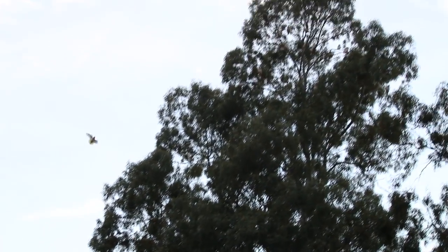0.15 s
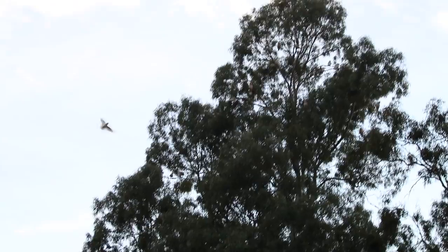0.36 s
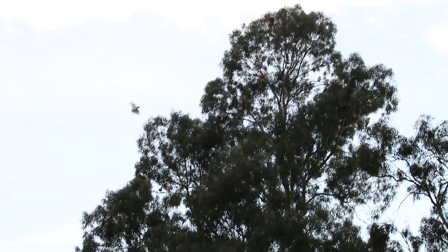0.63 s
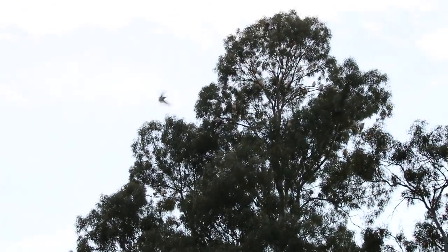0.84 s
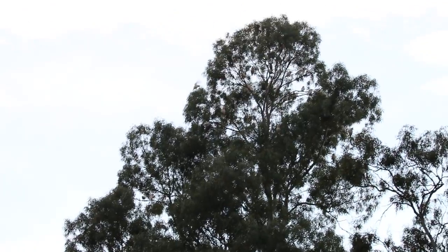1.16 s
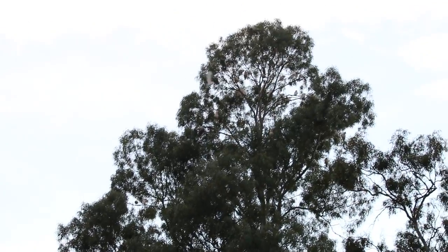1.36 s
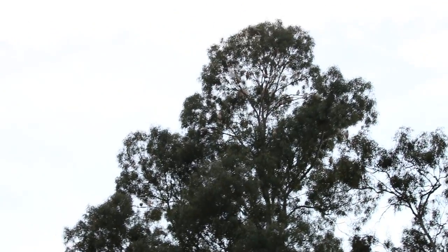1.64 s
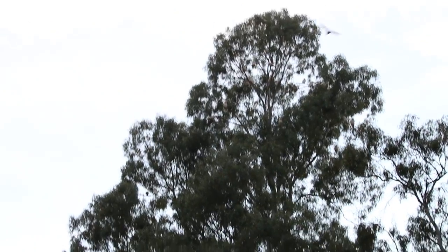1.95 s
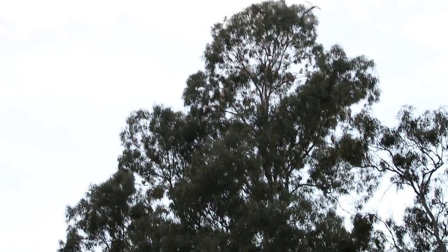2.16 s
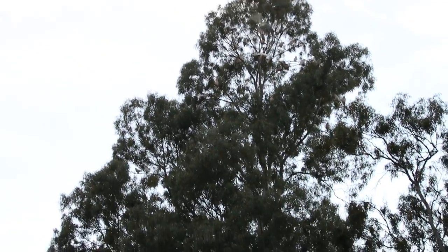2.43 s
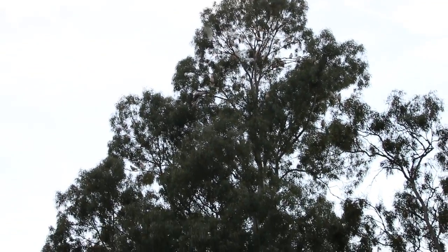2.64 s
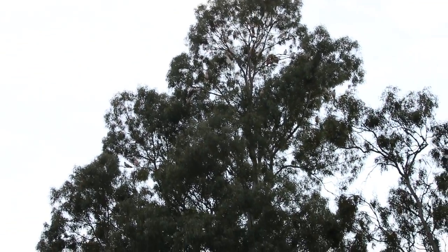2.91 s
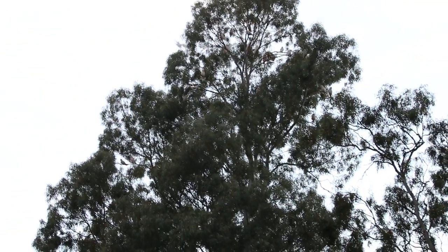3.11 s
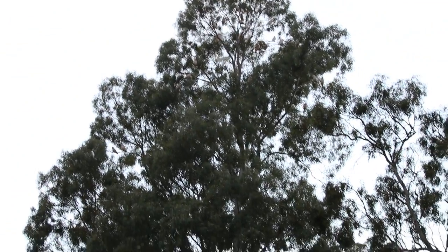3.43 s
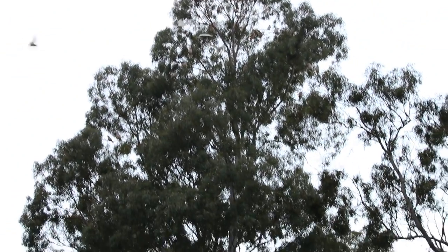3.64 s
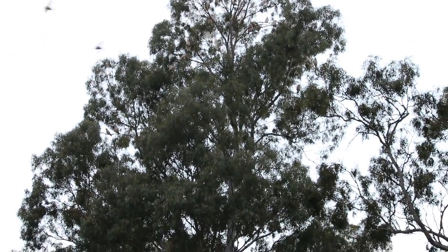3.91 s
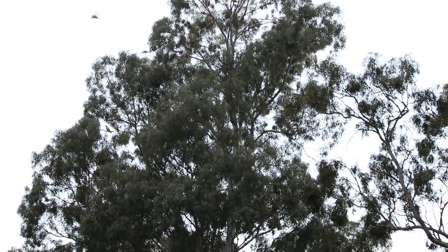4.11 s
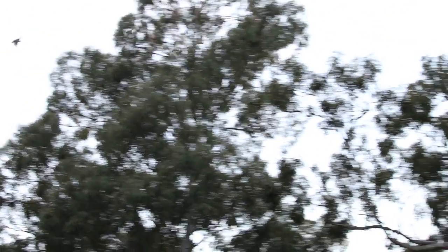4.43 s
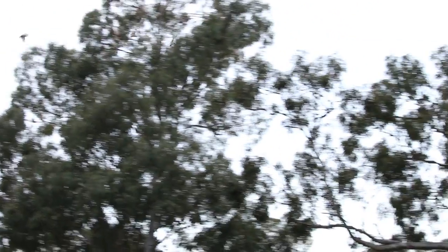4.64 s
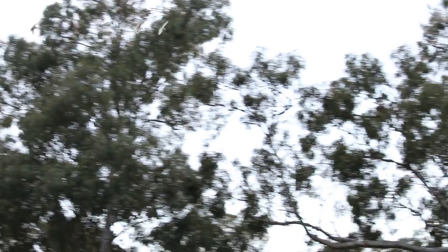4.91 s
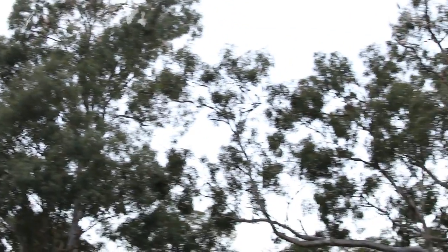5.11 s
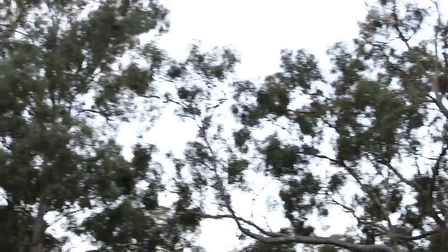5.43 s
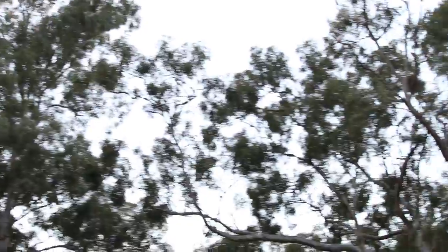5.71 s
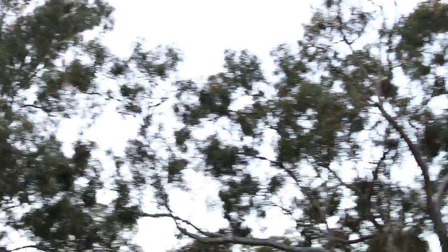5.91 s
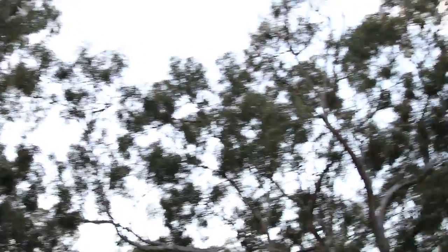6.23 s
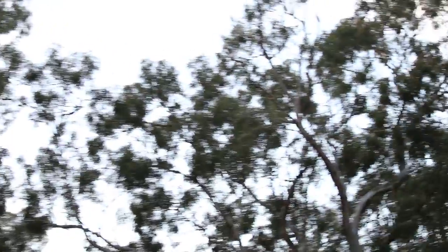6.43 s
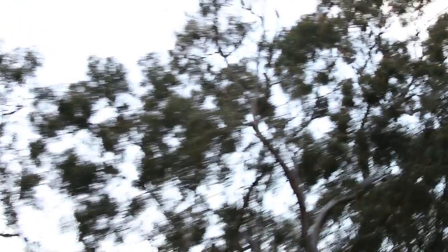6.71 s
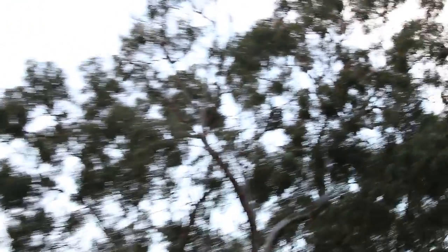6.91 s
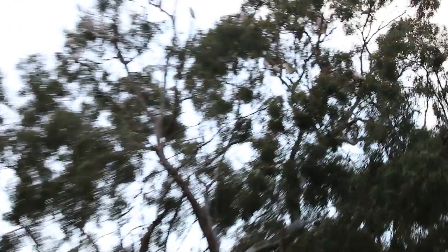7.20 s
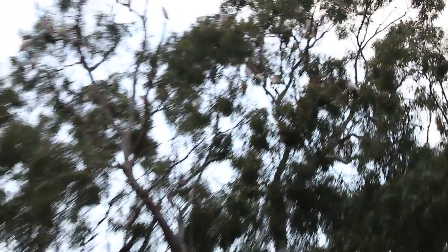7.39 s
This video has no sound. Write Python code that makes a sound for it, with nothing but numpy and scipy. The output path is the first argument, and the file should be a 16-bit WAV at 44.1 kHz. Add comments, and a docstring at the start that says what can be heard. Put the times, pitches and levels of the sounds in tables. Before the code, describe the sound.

A cockatoo flock passes in open air: rapid clusters of brief throaty yelps, then hoarse screeches mixed with more squawks, another strong burst midway, and later quieter, more scattered calls. One longer, bright, piercing cry stands out close to the end before a few faint notes. Far birds blur behind, the woodland adds a thin lingering echo, and soft low rumble with a faint hum continues throughout. Wide stereo outdoor pickup, near calls leaning left.

```python
"""Cockatoos call outdoors: near birds give short arched notes, one long held call and harsh rasps.
Notes and held call are harmonics of a gliding pitch through a vocal tract; rasps are random pulses
ringing throat resonances. Many overlapping far notes blur into a chorus.
Trees return a long thin echo of sparse taps, over shaped noise (a low rumble) and a faint hum."""
import sys
import numpy as np
from scipy import signal
from scipy.fft import rfft, irfft
from scipy.io import wavfile
from scipy.ndimage import uniform_filter1d

SR = 44100
rng = np.random.default_rng(int(sys.argv[2]) if len(sys.argv) > 2 else 0)


def transcribe(signal):
    """Save signal, clipped to [-1, 1], as a 16-bit WAV file at the path in sys.argv[1]."""
    frames = np.atleast_2d(signal).T
    limited = np.clip(frames, -1, 1)
    pcm = np.round(limited * 32767).astype(np.int16)
    wavfile.write(sys.argv[1], SR, pcm)


N = 333396
EDGE_HZ = 15760  # upper band limit


def gain_of(db):
    """Decibels to an amplitude factor."""
    return 10 ** (np.asarray(db) / 20)


def evened(x):
    """Scales to rms 1."""
    return x / np.sqrt(np.mean(x ** 2) + 1e-20)


def read(points, hz):
    """Interpolates (hz, value) points on a log-frequency axis."""
    point_hz, value = np.transpose(points)
    return np.interp(np.log(hz + 1), np.log(point_hz + 1), value)


def add(mix, start_s, sound):
    """Adds a stereo sound at start_s, cut at the end of the mix."""
    part = mix[:, max(round(start_s * SR), 0):][:, :sound.shape[1]]
    part += sound[:, :part.shape[1]]


def wander(count, hz):
    """Random wobble of rms 1, up to about hz: a moving average of white noise."""
    span = max(int(SR / hz), 1)
    return np.sqrt(span) * uniform_filter1d(rng.standard_normal(count), span)


# Background noise spectrum: [freq_hz, relative_db]
RUMBLE_SPECTRUM = [(15, -60), (32, -25.5), (113, -8), (379, -14), (705, -6), (2130, -7), (5030, -17.5),
                   (9000, -39.5), (15600, -45)]
RUMBLE_RMS_DB = -39
# Hum lines: [freq_hz, level_db]
HUM_LINES = [(100, -61), (124, -69.5), (144.5, -60)]


def hum():
    """Sine lines that waver in level and pitch."""
    out = np.zeros(N)
    for line_hz, level_db in HUM_LINES:
        level = np.sqrt(2) * gain_of(level_db + 2 * wander(N, 10))
        hz = line_hz + 2.3 * wander(N, 4.72)
        out += level * np.sin(2 * np.pi * np.cumsum(hz) / SR)
    return out


def rumble():
    """Distant low noise and hiss: shaped noise, alike in both channels in the bass, unlike in the treble."""
    hz = np.fft.rfftfreq(N, 1 / SR)
    a, b = rfft(rng.standard_normal((2, N)))
    likeness = read([(40, 1.0), (150, 0.91), (600, 0.81), (3000, 0.017)], hz)  # [freq_hz, correlation]
    likeness = np.clip(likeness, 0, 1)
    right = likeness * a + np.sqrt(1 - likeness ** 2) * b
    spectrum = np.array([a, right]) * gain_of(read(RUMBLE_SPECTRUM, hz))
    left_over_right_db = read([(30, 10.0), (300, -0.5), (2000, 0.5)], hz)  # [freq_hz, db]
    balance = gain_of(np.outer([.5, -.5], left_over_right_db))
    return gain_of(RUMBLE_RMS_DB) * evened(irfft(spectrum * balance, N))


def trees(x):
    """Sparse echoes from trunks and leaves: random signed taps, the treble dying first."""
    taps = np.zeros((2, SR))
    grid = np.arange(500, SR - 20, 20)  # samples
    at = grid + rng.integers(0, 20, (2, (SR - 501) // 20))
    np.put_along_axis(taps, at, rng.choice([-1., 1.], at.shape), 1)
    hz, t, spectrum = signal.stft(taps, SR, nperseg=256)
    t60_s = read([(600, 1.05), (3000, 0.81), (10000, 0.5)], hz)[:, None]  # [freq_hz, t60_s]
    tail = signal.istft(spectrum * gain_of(-60 * t / t60_s), SR, nperseg=256)[1]
    return signal.fftconvolve(x, tail / np.linalg.norm(tail[0]), axes=1)[:, :N]


def voice(hz, tract, rough, dull_db_per_khz, pan_db, count, vary_db):
    """Harmonics of an unsteady pitch through the vocal tract, dulled on the way, in stereo."""
    k = np.arange(1, count + 1)[:, None]
    hz = hz * (1 + 0.075 * rough * wander(len(hz), 420))
    turns = np.cumsum(hz) / SR + rng.random()
    # leaves on the way break up each harmonic
    rate, start = rng.random((2, count, 1))
    flutter = np.sin(2 * np.pi * (55 * rate * np.arange(len(hz)) / SR + start))
    # no two beaks are open alike
    colour_db = vary_db * (rng.standard_normal((count, 1)) + 1.56 * flutter)
    size = gain_of(read(tract, k * hz) + colour_db - dull_db_per_khz * k * hz / 1000)
    size *= k * hz < EDGE_HZ
    rms = np.sqrt((size ** 2).sum(0).mean() / 2)
    size *= (1 + rough * wander(len(hz), 900)) / rms  # uneven cycles
    side_db = np.array([.5, -.5])[:, None, None] * pan_db
    lead_s = side_db * 2.2e-5  # the louder microphone port is the nearer one
    shade = gain_of(side_db * np.minimum(k * hz / 1800, 1.3))  # the camera body shades treble most
    phase = k * (turns + hz * lead_s) + rng.random((count, 1))  # the tract spreads the phases
    return (size * shade * np.cos(2 * np.pi * phase)).sum(1)


# Vocal tract in short notes: [freq_hz, relative_db]
NOTE_TRACT = [(290, -41), (500, -7.5), (873, -18.5), (1270, -3), (1610, -3), (2200, -1), (3450, -8),
              (3950, -10.5), (5300, -16.5), (7000, -25), (9400, -31), (14000, -47)]
REACH = 1.52  # sounding length / core length


def note(core_s, top_hz, sag, lean, level_db, pan_db, rough, dull_db_per_khz, count, vary_db):
    """One syllable: the pitch arches over its top and keeps sagging as the sound fades."""
    u = np.linspace(-REACH, REACH, int(REACH * core_s * SR))  # core spans -1 to 1
    hz = top_hz * (1 - sag * u ** 2 + lean * u)
    swell = signal.windows.tukey(len(u), .7)
    return gain_of(level_db) * swell * voice(hz, NOTE_TRACT, rough, dull_db_per_khz, pan_db, count, vary_db)


# Level of the far birds together: [time_s, level_db]
CHORUS_LEVEL = [(0.0, -36.5), (0.65, -34.5), (0.78, -27), (1.35, -43.5), (2.08, -29), (3.62, -40),
                (3.81, -27), (4.78, -31), (5.03, -38.5), (5.49, -32.5), (6.91, -41.5), (7.25, -33),
                (7.56, -56)]


def chorus(count=560):
    """Overlapping notes of many far birds, most of them low, spread across the stereo image."""
    out = np.zeros((2, N))
    for when, size, low, bend, tip, loud, side in rng.random((count, 7)):
        core_s = 0.02204 + 0.02984 * size
        top_hz = 650 * (1 + 0.42 * low ** 2.2)
        call = note(core_s, top_hz, .16 * bend, 0.0788 * (tip - .5), 14.6 * loud, 14 * side - 9.5,
                    0.17, 0.093, count=10, vary_db=2.0)
        add(out, when * N / SR - .03, call)
    # the chorus level rises and falls, with swells just after the loudest near notes
    power = uniform_filter1d((out ** 2).mean(0), 5000)
    time_s, level_db = np.transpose(CHORUS_LEVEL)
    level = gain_of(np.interp(np.arange(N) / SR, time_s, level_db))
    return out / np.sqrt(abs(power) + 1e-9) * level


def resonate(x, hz, width_hz):
    """Gliding resonance: shifts the curve hz down to zero, smooths twice, shifts back."""
    turn = np.exp(2j * np.pi * np.cumsum(hz) / SR)
    r = np.exp(-np.pi * width_hz / SR)
    low = signal.lfilter([1 - r], [1, -r], x / turn)
    return 2 * (turn * signal.lfilter([1 - r], [1, -r], low)).real


# Rasping screeches: [start_s, length_s, level_db, throat_first_hz, throat_last_hz, left_over_right_db]
RASP_CALLS = [(1.756, 0.23, -27.5, 2180, 2850, -1.5), (2.072, 0.14, -33, 2400, 2440, -1.5),
              (2.74, 0.16, -33, 2400, 2420, -2), (3.011, 0.095, -29, 2300, 2520, -2.5),
              (4.602, 0.16, -33.5, 2270, 2300, 1.5), (4.8, 0.23, -34, 2350, 2390, -2),
              (5.199, 0.395, -36, 2130, 2290, -2.5), (6.037, 0.1, -36.5, 2400, 2400, -3),
              (6.531, 0.19, -38, 2260, 2330, -3)]


def rasps():
    """Chaotic pulses of the syrinx ring a gliding throat resonance and others beside it."""
    modes = [(.5, 613, -2.5), (1.0, 523, 9), (1.45, 790, 4),
             (2.1, 1650, 2.5), (3.0, 3470, -70)]  # [throat_multiple, width_hz, relative_db]
    out = np.zeros((2, N))
    for start_s, length_s, level_db, first_hz, last_hz, pan_db in RASP_CALLS:
        n = int(length_s * SR)
        pulses = (rng.random(n) < 1500 / SR) * gain_of(1.17 * rng.standard_normal(n))  # 1500 per s
        pulses = pulses - uniform_filter1d(pulses, size=60)  # no steady push is radiated
        throat_hz = np.linspace(first_hz, last_hz, n)
        call = sum(gain_of(mode_db) * evened(resonate(pulses, multiple * throat_hz, width_hz))
                   for multiple, width_hz, mode_db in modes)
        level = gain_of(level_db + 2.0 * wander(n, 30))
        call = level * evened(call) * signal.windows.tukey(n, .35)
        pair = np.array([np.roll(call, -round(pan_db)), call])  # louder side leads, 1 sample per dB
        add(out, start_s, pair * gain_of([[pan_db / 2], [-pan_db / 2]]))
    return out


# Vocal tract with the beak wide open: [freq_hz, relative_db]
HELD_TRACT = [(830, -18.5), (1650, -15), (2500, -3.5), (3320, -14), (4150, -22), (4970, -15.5),
              (5800, -22.5), (6650, -19.5), (8500, -31.5), (15000, -60)]
# Held call contour: [time_s, pitch_hz, level_db]
HELD_CONTOUR = [(6.868, 1167, -27), (6.884, 1078, -25), (6.907, 1039, -23), (6.924, 881, -24),
                (6.96, 850, -23), (7.003, 821, -23.5), (7.066, 851, -24.5), (7.089, 835, -20),
                (7.115, 569, -38)]


def held_call():
    """A long clean call; a ground bounce makes its harmonics swell and fade as the pitch drifts."""
    time_s, pitch_hz, level_db = np.transpose(HELD_CONTOUR)
    t = np.arange(time_s[0], time_s[-1], 1 / SR)
    hz = np.interp(t, time_s, pitch_hz)
    call = voice(hz, HELD_TRACT, 0.037, 0, -0.82, count=18, vary_db=1)
    call = call * gain_of(np.interp(t, time_s, level_db)) * signal.windows.tukey(len(t), .04)
    bounce_delay_s, bounce_gain = 0.0078, 0.59
    out = np.zeros((2, N))
    add(out, time_s[0], call)
    add(out, time_s[0] + bounce_delay_s, bounce_gain * call)
    return out


# Notes of single birds: [core_start_s, core_length_s, top_pitch_hz, level_db, left_over_right_db]
NEAR_NOTES = [(0.128, 0.068, 741, -26.5, -7), (0.193, 0.043, 862, -25.5, 0.5),
              (0.355, 0.039, 732.4, -27.0, -4.0), (0.418, 0.039, 695, -40, -8),
              (0.59, 0.044, 864, -24, -3.5), (0.653, 0.037, 778, -28.5, -6), (0.69, 0.067, 856, -20, -5),
              (0.764, 0.052, 837, -18.5, -5), (0.819, 0.039, 810, -46, 1), (0.864, 0.07, 859, -26.0, -2.0),
              (0.882, 0.028, 1048, -25, -7), (0.943, 0.035, 1048, -24.5, -3.5),
              (1.018, 0.031, 796, -29.5, -6), (1.098, 0.049, 936, -35, 10.5),
              (1.192, 0.034, 911, -30.5, 9.5), (1.393, 0.036, 1012, -40.5, 12),
              (1.515, 0.058, 686, -33.5, -4.5), (1.577, 0.043, 763, -30, 5), (1.69, 0.049, 1070, -32, 10.5),
              (1.955, 0.036, 928, -27.5, -12), (2.18, 0.042, 687, -30, -7.5),
              (2.224, 0.061, 735, -29, -7.5), (2.286, 0.047, 753, -32.5, -7), (2.325, 0.033, 738, -31, -10),
              (2.411, 0.053, 846, -30.5, -7.5), (2.475, 0.035, 748, -24.5, -6.5),
              (2.515, 0.073, 714, -27.5, -9), (2.57, 0.081, 722, -36, -11.5), (2.786, 0.04, 840, -28, -8),
              (2.965, 0.059, 756.0, -26, -4), (3.046, 0.038, 767.6, -24.5, -4.5),
              (3.194, 0.045, 716, -32.0, -4), (3.264, 0.068, 716, -40.5, -7), (3.442, 0.048, 805, -66, -14),
              (3.579, 0.057, 853, -30.5, -4), (3.673, 0.06, 854, -15.5, -2.0),
              (3.747, 0.051, 845, -17, -1.5), (3.876, 0.038, 754, -24, -8), (4.104, 0.049, 936, -20.5, -8),
              (4.167, 0.031, 1017, -21, -2), (4.249, 0.035, 699.0, -53, -14),
              (4.305, 0.039, 664, -63, -5.0), (4.363, 0.035, 736, -26, -7.5), (4.381, 0.06, 934, -30.5, -9),
              (4.482, 0.036, 732, -29, -2), (4.935, 0.038, 715, -36, -11.5), (5.195, 0.037, 735, -30.5, -9),
              (5.255, 0.071, 700, -30.0, -7.5), (5.315, 0.07, 699, -30.5, -7.5),
              (5.373, 0.087, 724, -31.5, -9.5), (5.452, 0.028, 729, -30.5, -12),
              (5.491, 0.048, 696, -32, -10), (5.622, 0.033, 723, -35, -9), (5.769, 0.032, 886, -34, -13.5),
              (5.815, 0.042, 899, -31.0, -10.5), (5.965, 0.067, 713.0, -34.5, -7),
              (6.147, 0.068, 709, -32.5, -4.5), (6.215, 0.04, 692, -29.5, -7), (6.338, 0.034, 676, -31, -8),
              (6.578, 0.035, 722, -28.5, -8.5), (7.382, 0.035, 864, -39, 2), (7.529, 0.032, 850, -35, 1.5)]
SAG_AT_800_HZ = .095  # share of top pitch lost at both core ends, in proportion to pitch
LEAN = .015  # share of top pitch gained from core middle to end


def near_birds():
    """The clear notes; fainter ones come from farther off, rougher and duller."""
    out = np.zeros((2, N))
    for start_s, core_s, top_hz, level_db, pan_db in NEAR_NOTES:
        far = np.clip((-7.5 - level_db) / 15, 0, 1)
        call = note(core_s, top_hz, SAG_AT_800_HZ * top_hz / 800, LEAN, level_db, pan_db,
                    0.089 + 0.04 * far, 1.32 * far, count=16, vary_db=2 * far)
        add(out, start_s - (REACH - 1) * core_s / 2, call)
    return out


def scene():
    """Birds, their echo from the trees, and the background."""
    near, held, far = near_birds() + rasps(), held_call(), chorus()
    echo = trees(gain_of(-8.5) * near + gain_of(-9) * held + gain_of(-8) * far)
    return near + held + far + echo + rumble() + hum()


def record(dry):
    """The band limit of the camera: a steep linear-phase low-pass."""
    low_pass = signal.firwin(2047, EDGE_HZ, window=("kaiser", 9), fs=SR)
    return signal.oaconvolve(dry, low_pass[None], "same")


dry = scene()
out = record(dry)
transcribe(out)
```